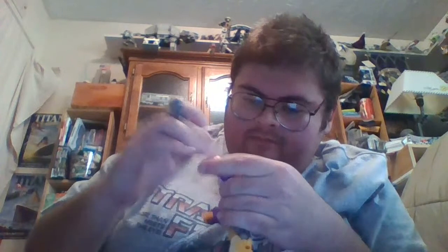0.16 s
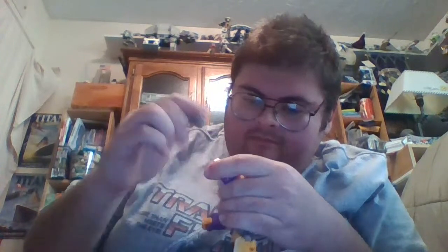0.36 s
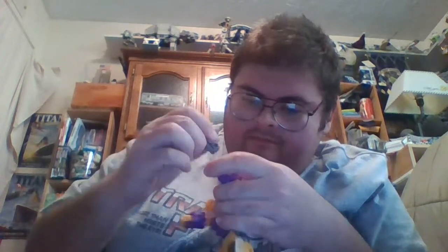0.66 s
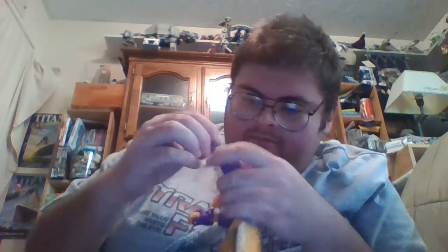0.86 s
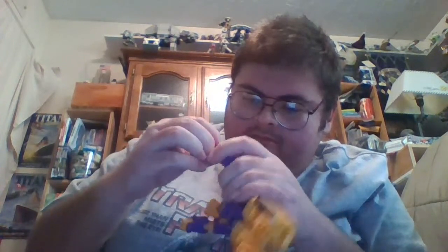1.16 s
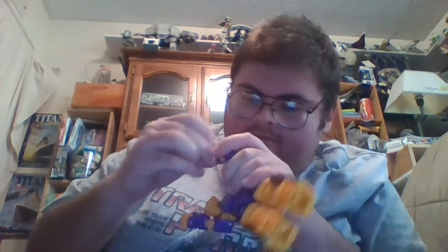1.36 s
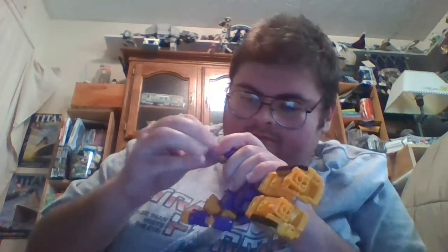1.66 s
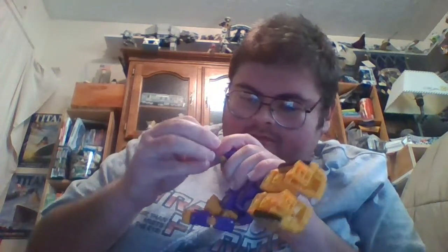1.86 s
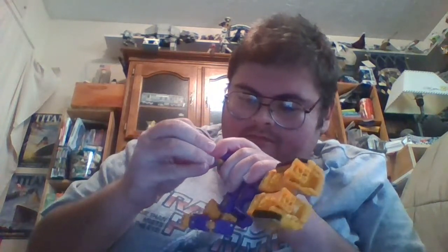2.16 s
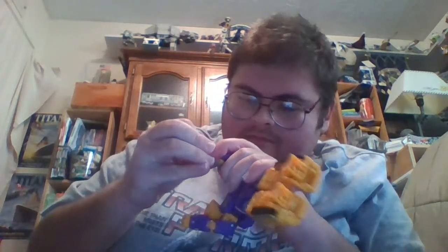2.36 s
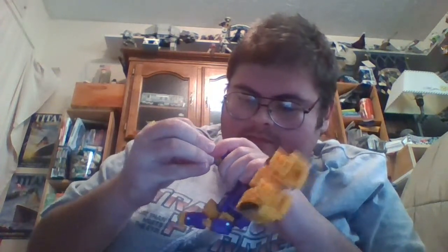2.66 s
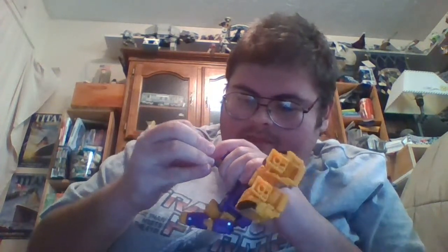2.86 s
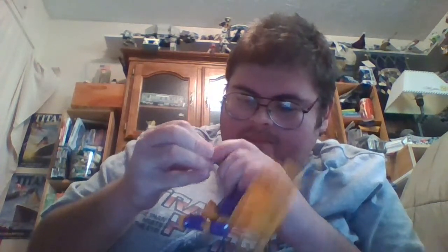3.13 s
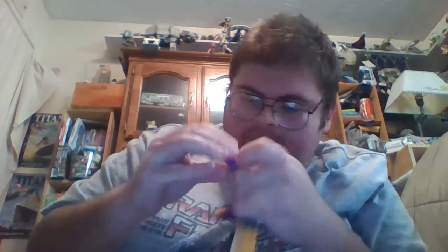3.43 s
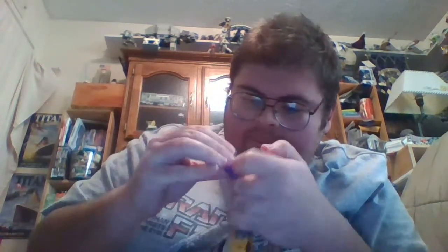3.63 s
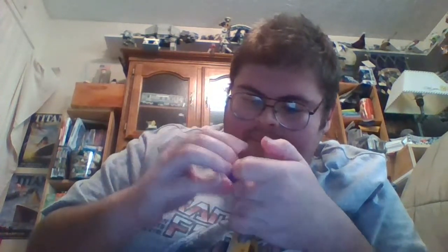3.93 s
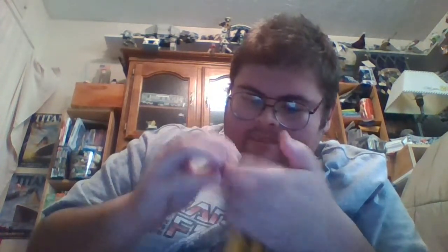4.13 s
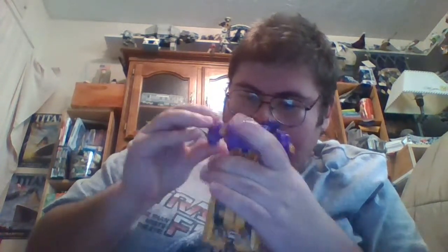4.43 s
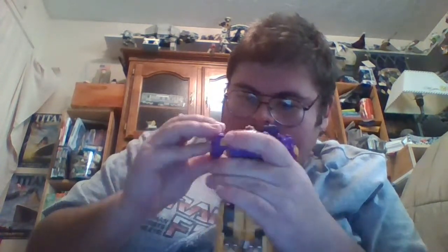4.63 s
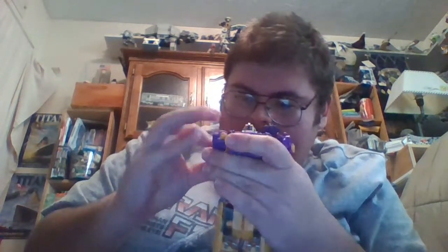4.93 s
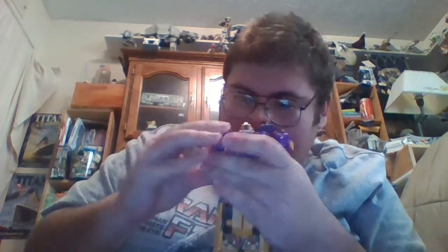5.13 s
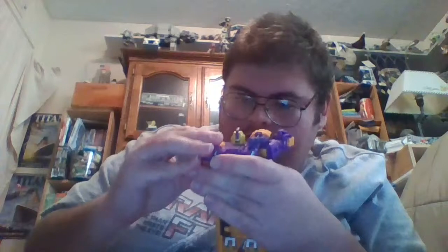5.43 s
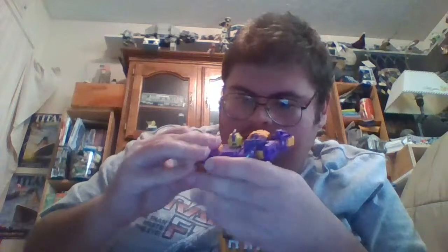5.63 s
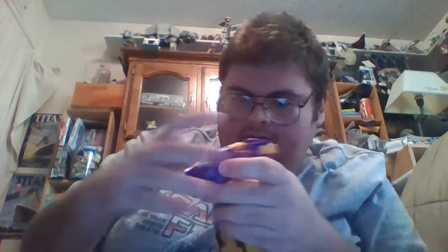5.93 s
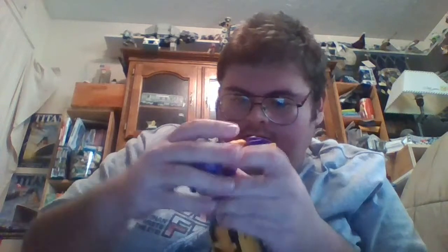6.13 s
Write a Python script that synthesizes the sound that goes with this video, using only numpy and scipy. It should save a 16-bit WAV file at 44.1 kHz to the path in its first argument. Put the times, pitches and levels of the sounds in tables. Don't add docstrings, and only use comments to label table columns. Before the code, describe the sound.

A small plastic figure is handled half a metre from a laptop microphone in a furnished, nearly dry room. Until 1.3 s there are only barely audible ticks, finger rubs and a soft hollow knock around 0.8. From 1.4 to 1.54 s a part is pressed with small dull clicks, the strongest at 1.52. Near-silence follows, with a faint rub at 2.4. At 2.61 s a ball joint lets go in several very loud, bright cracks within about ten milliseconds, then chatters briefly. At 2.85 s a fuller double clack pushes a part home, with low hollow knocks and tiny rebounds. Soft rubs run from 3.1 to 3.5; light ticks at 3.9, 4.2, 4.3 and 4.5. A crisp hinge snap lands at 5.0, a sharper second slip at 5.27, then faint ticks until 5.8 and quiet to the end. Suppressed hum and twinkling hiss swell after sounds and sink back.

```python
import sys
import numpy as np
from scipy import signal
from scipy.io import wavfile
from scipy.ndimage import uniform_filter1d

SR = 44100
rng = np.random.default_rng(int(sys.argv[2]) if len(sys.argv) > 2 else 0)


def put_to_file(sound):
    columns = np.atleast_2d(sound).T
    safe = np.clip(columns, -1, 1)
    whole_steps = np.round(safe * 32767)
    wavfile.write(sys.argv[1], SR, whole_steps.astype(np.int16))


def magnitude_from_level(level_db):
    exponent = np.asarray(level_db, float) / 20
    return 10 ** exponent


N = 277124

# pitch_hz, level_db, t60_s
BALL = [(1989, -6.5, 0.042), (2260, -0.5, 0.041), (2550, -10, .02), (3587, -2, 0.018), (3980, -4, .02),
        (4473, -6.5, 0.022), (5430, -10.5, .015), (6050, -7, 0.023), (6614, -2, 0.029), (7620, -10, .02),
        (8030, -13.5, .015), (8600, -17, 0.023), (8700, -10, 0.035), (9260, -7, 0.02), (9390, 0, 0.023),
        (10230, -9.5, 0.011), (10200, -12, .015), (10950, -9.5, .02), (11400, -14.5, .015),
        (13200, -16.5, 0.022), (14550, -19, 0.014), (15170, -23, 0.011)]
# pitch_hz, level_db, t60_s
TRUNK = [(2110, -1.5, 0.021), (2356, 2, 0.02), (2540, -2, 0.01), (2920, -8, 0.01), (3680, -1.5, 0.015),
         (4030, -1, 0.025), (4320, 1, 0.024), (4830, -5, 0.022), (5290, -3, 0.029), (5440, 1, 0.011),
         (6400, 0.5, 0.015), (6900, -7.5, 0.014), (7400, -5.5, 0.012), (8600, -4.5, 0.015),
         (9250, -1, 0.013), (9560, 0.5, .01), (10220, -1, 0.013), (10870, -0.5, 0.0093),
         (12000, -4.5, 0.0095), (13250, -5.5, 0.0069), (13500, -6.5, .008), (14400, -12.5, 0.0058),
         (15200, -10, .01)]
# pitch_hz, level_db, t60_s
HINGE = [(2190, -2.5, 0.081), (2554, 3.5, 0.029), (2760, -8.5, 0.04), (4110, 2.5, 0.041),
         (5060, -2.5, 0.032), (6730, -8, 0.0092), (7360, -9, 0.093), (8530, -8, 0.02), (8920, -10, 0.017),
         (9470, 2.5, 0.011), (9880, 4, 0.0084), (11240, -6.5, 0.0075), (11040, -24.5, 0.0043),
         (13320, -16, .012), (15100, -22, .01)]
# until_s, modes, shell_re_body_db
WORK = [
    (1.1, BALL, -5),
    (2.5, TRUNK, 3.5),
    (2.8, BALL, -3),
    (3.0, TRUNK, -4.5),
    (3.8, TRUNK, -6),
    (4.28, HINGE, -14),
    (4.6, BALL, -25),
    (5.2, HINGE, 2.5),
    (5.35, BALL, -21),
    (7.5, HINGE, -8),
]


def leak(colour, level_db, twinkle_db, bins, frames):
    hz, _, cells = signal.stft(rng.standard_normal(N), SR, nperseg=1024, noverlap=896)
    patch = rng.standard_normal(cells.shape)
    for size, axis in ((bins, 0), (frames, 1), (frames, 1)):
        patch = uniform_filter1d(patch, size, axis=axis)
    colour_hz, colour_db = np.transpose(colour)
    db = np.interp(np.log(hz + 1), np.log(colour_hz), colour_db, left=-90, right=-90)
    cells = cells * magnitude_from_level(db[:, None] + twinkle_db * patch / patch.std())
    noise = signal.istft(cells, SR, nperseg=1024, noverlap=896)[1][:N]
    return magnitude_from_level(level_db) * noise / noise.std()


def wake(toy):
    threshold_db, settle_s, share = -63.5, .02, .27
    keep = np.exp(-1 / (settle_s * SR))
    power = signal.lfilter([1 - keep], [1, -keep], toy ** 2)
    return share * 10 * np.log10(1 + power / magnitude_from_level(threshold_db) ** 2)


def background(toy):
    # time_s, opening_db
    opening = [(0, 11), (.15, 6.5), (.44, -0.3), (1.28, 0.6), (1.57, 9.5), (1.71, 3), (2.55, 1), (2.66, 11),
               (2.8, 12), (3.03, 11.5), (3.3, 5.5), (3.64, 2), (4.22, 1.5), (4.44, 4), (4.81, 1),
               (5.41, 6.5), (5.7, 1.5), (6.28, 0)]
    # pitch_hz, density_db_per_hz
    hum_colour = [(15, -73), (25, -39.5), (48, -27), (70, -0.5), (193, 0), (425, -13), (483, -13),
                  (593, -18), (684, -14.5), (954, -26.5), (1100, -25.5), (1430, -50.5), (2420, -120)]
    # pitch_hz, density_db_per_hz
    room_colour = [(530, -33.5), (900, -13.5), (1370, -6.5), (1720, 0), (2420, -4.5), (3040, -7.5),
                   (3300, -1.5), (3610, -5), (6660, -7.5), (7640, -14.5), (8000, -3.5), (10400, -33),
                   (17600, -120)]
    # pitch_hz, density_db_per_hz
    hiss_colour = [(4590, -42), (7800, -20), (8770, -3.5), (9980, 1.5), (10800, -3.5), (12000, -4),
                   (12500, -7.5), (15000, -6.5), (15700, -10.5), (16000, -21)]
    open_db = np.interp(np.arange(N) / SR, *np.transpose(opening))
    lift_db = wake(toy)
    hum = leak(hum_colour, -70 + .65 * open_db, 3.4, bins=2, frames=8)
    room = leak(room_colour, -78.5 + open_db + lift_db, 5.1, bins=2, frames=8)
    hiss = leak(hiss_colour, -72.5 + .9 * open_db + lift_db, 1.5, bins=8, frames=5)
    return hum + room + hiss


def walls(toy):
    level_db, t60_s, gap_s = -19, .13, .008
    t = np.arange(SR // 3) / SR
    tail = rng.standard_normal(len(t)) * magnitude_from_level(-60 * t / t60_s) * (1 - np.exp(-t / gap_s))
    return signal.fftconvolve(toy, magnitude_from_level(level_db) * tail / np.sqrt(np.sum(tail ** 2)))[:N]


def ring(modes, slips, chance, scatter_db, detune, grip=1, crack=0):
    hz, db, t60_s = np.transpose(modes)[:, :, None]
    spot, drift = chance.standard_normal((2, len(modes), 1))
    t = np.arange(SR // 10) / SR
    decay = magnitude_from_level(db + scatter_db * spot - 60 * grip * t / t60_s)
    tones = decay * np.sin(2 * np.pi * hz * (1 + detune * drift) * t)
    answer = tones[::2].sum(0) - tones[1::2].sum(0)
    answer[0] = crack
    return signal.fftconvolve(answer, slips)


def add(track, start_s, peak_db, sound):
    i = int(start_s * SR)
    track[i:i + len(sound)] += magnitude_from_level(peak_db) * sound[:N - i] / np.abs(sound).max()


def knocks():
    # start_s, peak_db, push_ms
    pushes = [(.69, -60.5, 6.9), (0.821, -55.5, 3.5), (0.843, -64.5, 2.8), (1.648, -57, 1.4),
              (2.542, -52.5, 1.9), (2.566, -54, 2.5), (2.638, -58, 0.61), (2.851, -38.5, 0.44),
              (2.867, -40, 0.59), (2.91, -46, 0.58), (2.961, -51, 1), (3.061, -64, 2.5), (1.529, -65, 1.9),
              (3.539, -56, 0.49), (3.571, -56.5, 0.89), (3.671, -57.5, 2.7), (3.755, -66, 4.1)]
    # pitch_hz, level_db, t60_s
    hollow = [(126, -3.5, 0.19), (164, -2.5, 0.11), (256, 2, 0.14), (329, -4.5, 0.078), (448, -9.5, 0.049),
              (626, -8, 0.089), (796, -4, .05), (950, -12.5, 0.022), (1159, -6.5, .03)]
    out = np.zeros(N)
    t_ms = np.arange(SR // 40) / SR * 1000
    for (start_s, peak_db, push_ms), seed in zip(pushes, rng.integers(1 << 30, size=len(pushes))):
        push = np.sin(np.pi * np.clip(t_ms / push_ms, 0, 1)) ** 2
        sound = ring(hollow, push, np.random.default_rng(seed), scatter_db=3, detune=.062)
        add(out, start_s, peak_db, sound)
    return out


def snaps(events, work, reach):
    grip_ms = 8
    out = np.zeros(N)
    bands = [signal.butter(5, edges_hz, "band", fs=SR, output="sos") for edges_hz in reach]
    for (start_s, *levels_db, build_ms), seed in zip(events, rng.integers(1 << 30, size=len(events))):
        chance = np.random.default_rng(seed)
        grit = chance.standard_normal(SR // 8)
        u = np.arange(len(grit)) / (SR * max(build_ms, .2) / 1000)
        slips = grit * np.abs(grit) ** .5 * (u * np.exp(-u)) ** 2
        piece = next(modes for until_s, modes, *_ in work if start_s < until_s)
        for (low_hz, high_hz), band, peak_db in zip(reach, bands, levels_db):
            region = [mode for mode in piece if low_hz < mode[0] < high_hz]
            sound = ring(region, slips, chance, scatter_db=2, detune=.004,
                         grip=1 + build_ms / grip_ms, crack=magnitude_from_level(7))
            add(out, start_s - .0004, peak_db, signal.sosfilt(band, sound))
    return out


def joints():
    # start_s, edges_db, body_db, socket_db, build_ms
    twists = [
        (2.604, -52, -61, -40, 2.2),
        (2.61, -60, -55, -23, .47),
        (2.6114, -27, -38.5, -41, 0.55),
        (2.6126, -10, -42.5, -21.5, 0.66),
        (2.6168, -9.5, -42, -15, 0.63),
        (2.6213, -13.5, -42, -31, 0.73),
        (5.268, -50, -73, -47, 1.1),
        (5.2719, -24.5, -54, -29, 0.91),
        (5.2765, -43, -59, -47, .64),
    ]
    # start_s, edges_db, body_db, socket_db, gap_ms
    rattles = [
        (2.6285, -31, -42.5, -28.5, 6.9),
        (5.28, -42, -62, -57, 5.1),
    ]
    # start_s, edges_db, body_db, socket_db, build_ms
    pushes = [(1.403, -50, -60, -59, 4.5), (1.415, -54, -59, -61, 9.4), (1.491, -58, -57.5, -76, 2.7),
              (1.502, -61, -57, -62, 5.4), (1.5208, -36, -40.5, -43.5, 1.24), (1.524, -46.5, -46, -49, 3.3),
              (1.536, -61, -63, -60, 4.8), (2.8499, -16.5, -26, -34.5, 0.49),
              (2.8526, -22.5, -22.5, -36, 1), (2.859, -36, -34.5, -45.5, 1.3), (2.864, -38, -37, -37, 0.74),
              (2.867, -25.5, -33, -46.5, 0.76), (2.8703, -28, -32.5, -37.5, .39),
              (2.8761, -48, -47.5, -42, 1.1), (2.881, -39, -38, -37, 0.97), (2.883, -43.5, -40.5, -33, 1.3),
              (2.888, -43, -45.5, -45, 2.8), (5.0003, -25, -49, -50, 1.2), (5.003, -37, -56.5, -46, 3),
              (5.013, -44, -62, -64, 4.7), (5.0231, -40.5, -53, -54, 1.5), (5.073, -55, -62.5, -69, 3.5)]
    # start_s, edges_db, body_db, build_ms
    ticks = [(.104, -50, -82, 2.4), (.18, -51.5, -66, 4.7), (.44, -59, -73, 1.3),
             (3.916, -47.5, -65.5, 1.6), (4.205, -51, -72, 6.2), (4.299, -34.5, -64, 2.4),
             (4.317, -46, -60, 2.1), (4.5001, -37.5, -64, 0.76), (4.653, -51.5, -86, .74),
             (4.692, -55, -62, 4.7), (5.243, -49, -70, 7.1), (5.42, -51, -58, 0.95),
             (5.615, -45.5, -78, 1.16), (5.751, -44, -71, 1.15), (5.772, -53.5, -71, 1.1)]
    # start_s, edges_db, body_db, build_ms
    rubs = [(0.382, -52, -85, 11.4), (.404, -63, -67, 19), (.684, -58, -83, 7.5), (2.405, -59, -65.5, 24.3),
            (3.144, -47.5, -59, 15), (3.32, -53, -70, 12), (3.41, -54, -65.5, 14), (3.49, -70, -67.5, 12),
            (4.13, -47.5, -77, 25), (4.325, -49, -67, 24), (4.37, -51, -73, 33), (4.42, -51, -62.5, 21),
            (4.703, -54, -71, 19), (4.736, -48.5, -72, 22.5), (5.4, -51.5, -61.5, 23),
            (5.729, -51, -79.5, 10.5)]
    fall_db = np.array([1.5, 2, 4])
    chatter = []
    for start_s, *levels_db, gap_ms in rattles:
        for k in range(4):
            chatter.append((start_s + k * gap_ms / 1000, *(np.array(levels_db) - k * fall_db), .8))
    light = [(s, edges, body, body - 2.5, build_ms) for s, edges, body, build_ms in ticks + rubs]
    rows = []
    for s, edges, body, socket, build_ms in twists + chatter + pushes + light:
        shell_re_body_db = next(db for until_s, _, db in WORK if s < until_s)
        rows.append((s, edges, body + shell_re_body_db, body, socket, build_ms))
    return rows


def clicks():
    # low_hz, high_hz
    reach = [
        (8340, 17000),
        (1840, 3100),
        (3000, 5150),
        (5180, 8000),
        (1300, 2050),
    ]
    # pitch_hz, level_db, t60_s
    belly = [(1530, -7.5, .015), (1653, -2, 0.027), (1840, -2, 0.022)]
    # start_s, peak_db, build_ms
    presses = [(.02, -65, 9), (1.404, -51.5, 1.3), (1.415, -57, 12.5), (1.445, -59, 12), (1.494, -51, 8.7),
               (1.5215, -45, 1.5), (1.535, -58, 5), (2.615, -59, 7.8), (2.76, -74, 16),
               (2.8505, -29.5, 1.5), (2.853, -36, 0.57), (2.868, -46, 0.53), (2.885, -50, 7.9),
               (2.95, -60, 12), (3.04, -68, 15), (3.13, -69, 9.4), (3.25, -71, 14), (3.40, -65.5, 29),
               (3.47, -72.5, 21), (4.43, -67.5, 10), (5.41, -66, 13)]
    toy = snaps(joints(), WORK, reach[:4]) + snaps(presses, [(np.inf, belly)], reach[4:])
    return signal.sosfilt(signal.butter(2, 14100, fs=SR, output="sos"), toy)


def scene():
    toy = clicks() + knocks()
    return (toy + background(toy) + walls(toy))[None]


def roll_off(x):
    return signal.sosfilt(signal.butter(12, 16440, fs=SR, output="sos"), x)


def record(dry):
    low_hz, top_hz = 70, 15600
    mic = signal.sosfilt(signal.butter(3, low_hz, "high", fs=SR, output="sos"), dry)
    mic = signal.sosfilt(signal.ellip(6, .3, 25, top_hz, fs=SR, output="sos"), mic)
    return roll_off(mic)


dry = scene()
out = record(dry)
put_to_file(out)
```